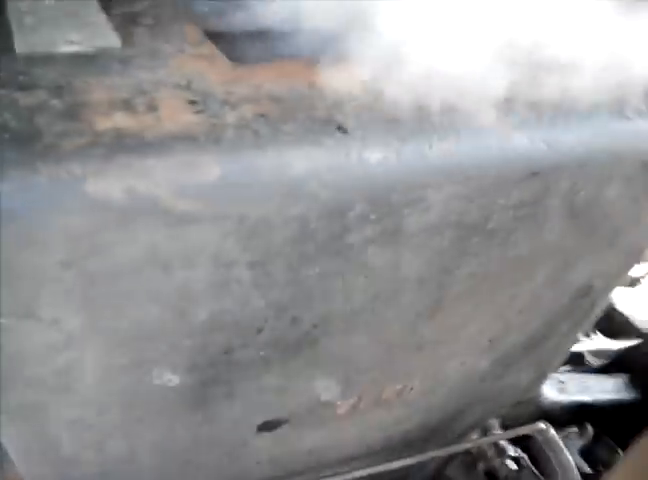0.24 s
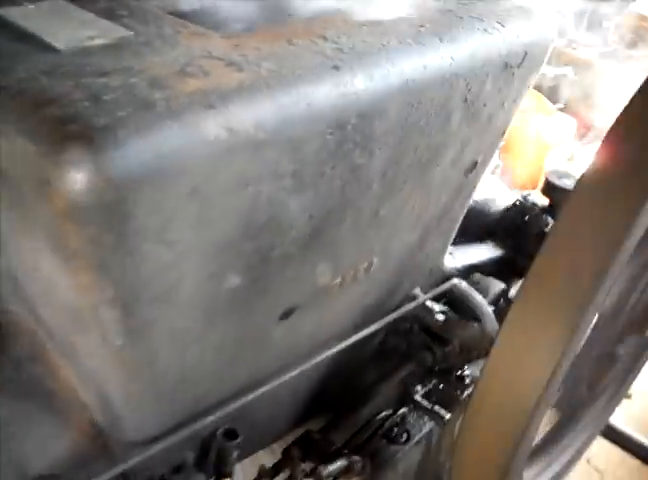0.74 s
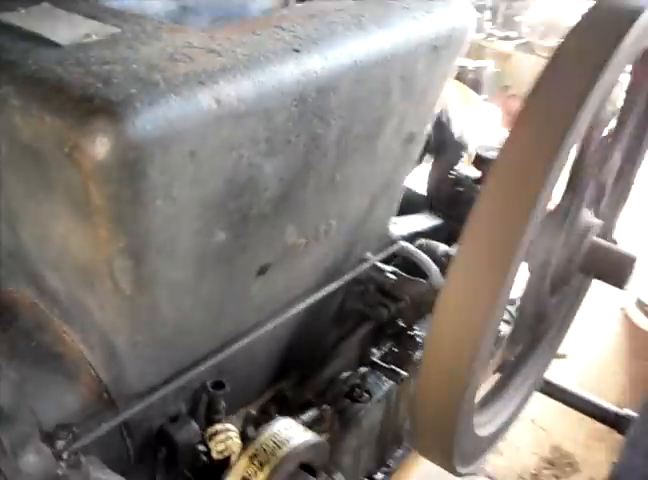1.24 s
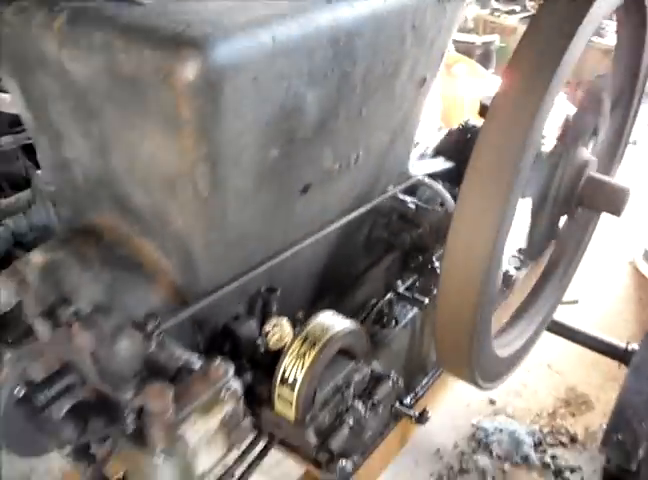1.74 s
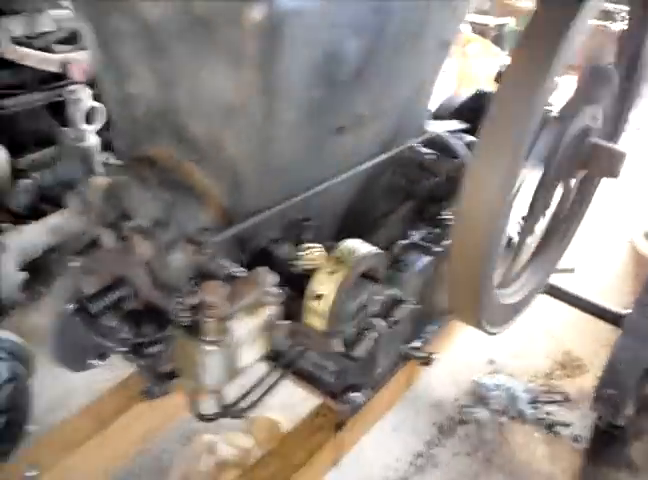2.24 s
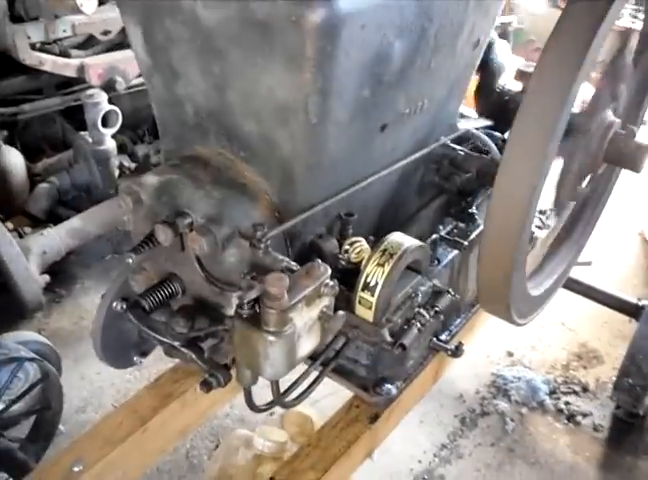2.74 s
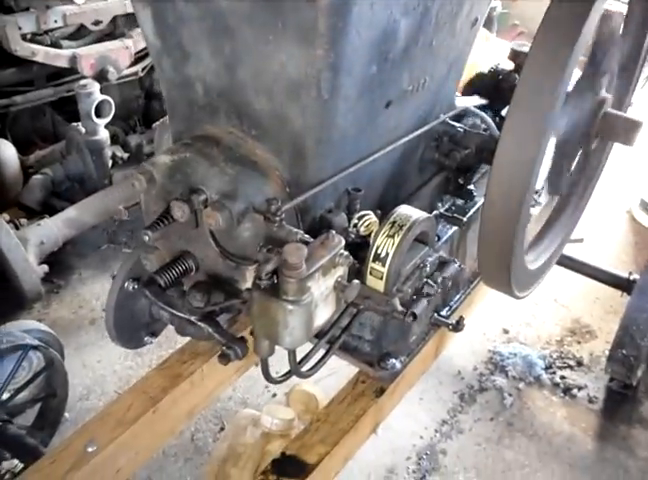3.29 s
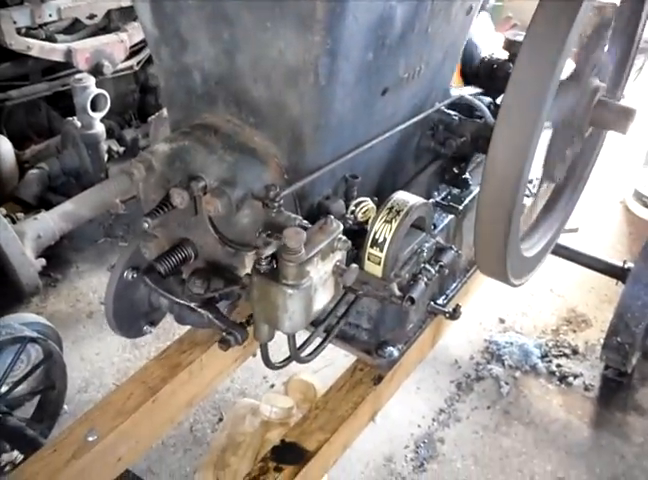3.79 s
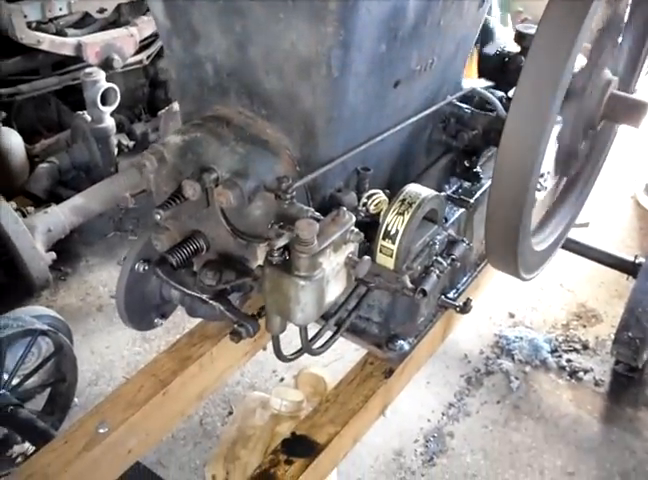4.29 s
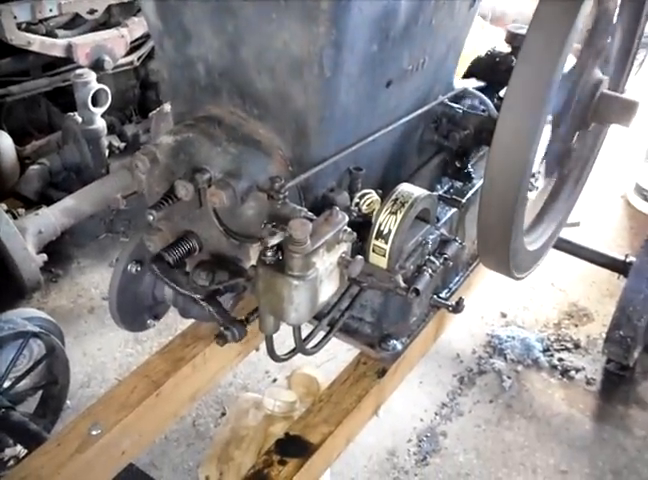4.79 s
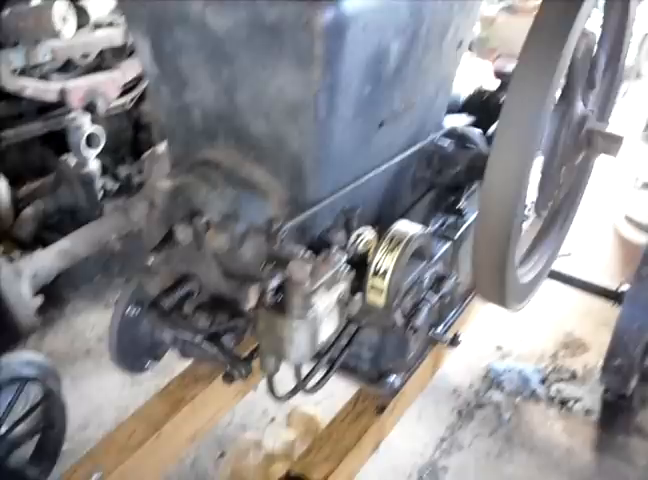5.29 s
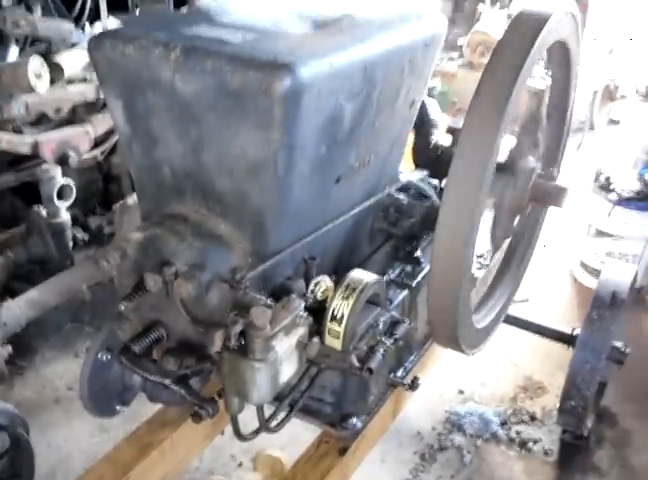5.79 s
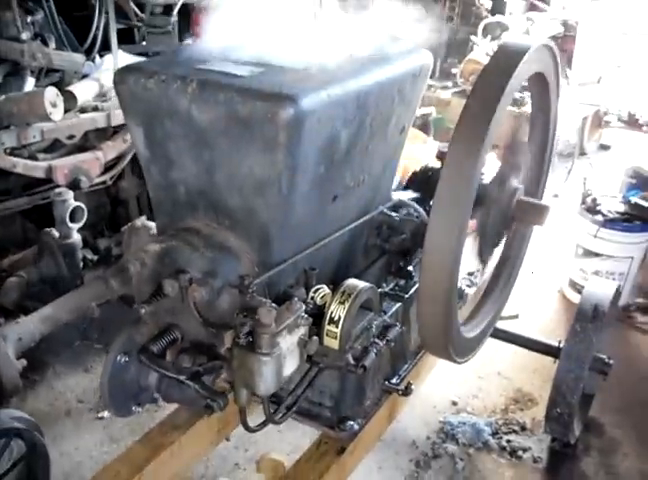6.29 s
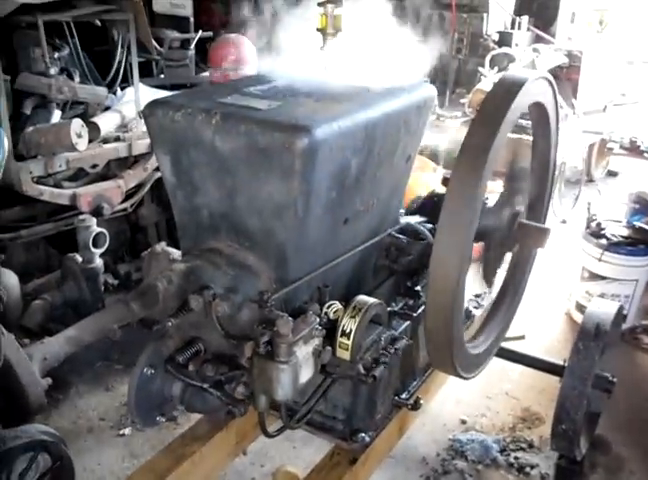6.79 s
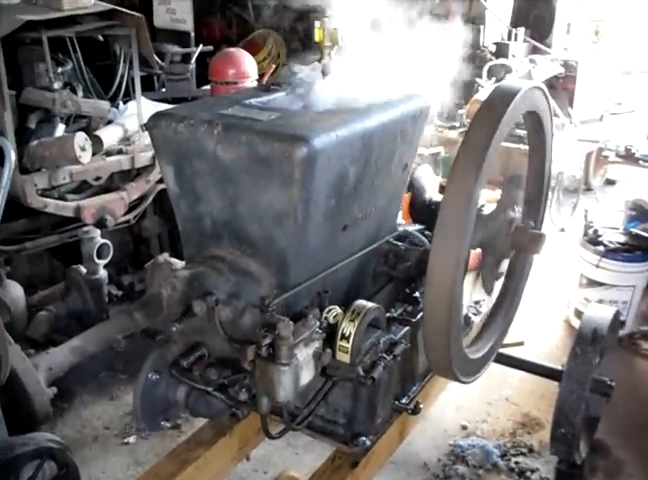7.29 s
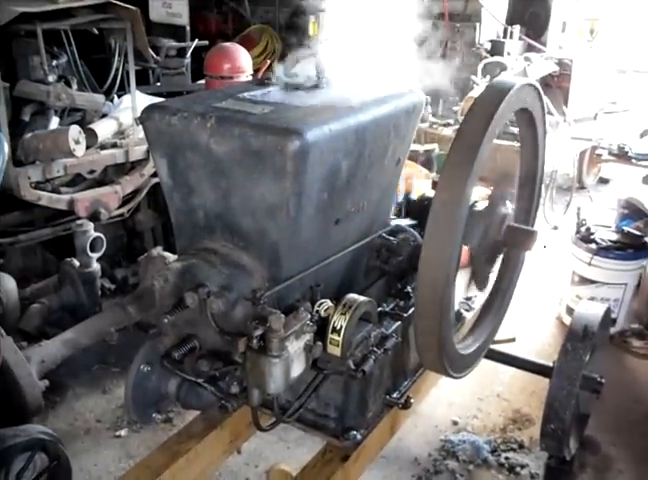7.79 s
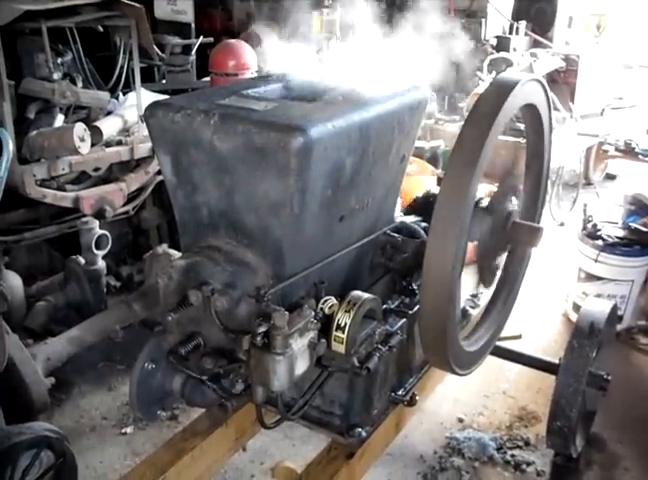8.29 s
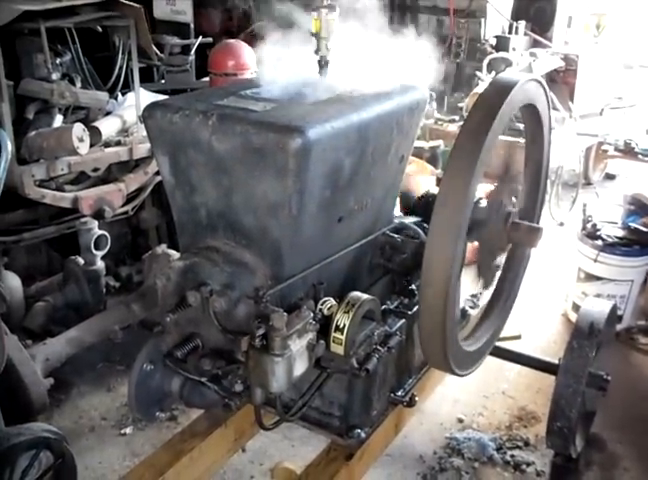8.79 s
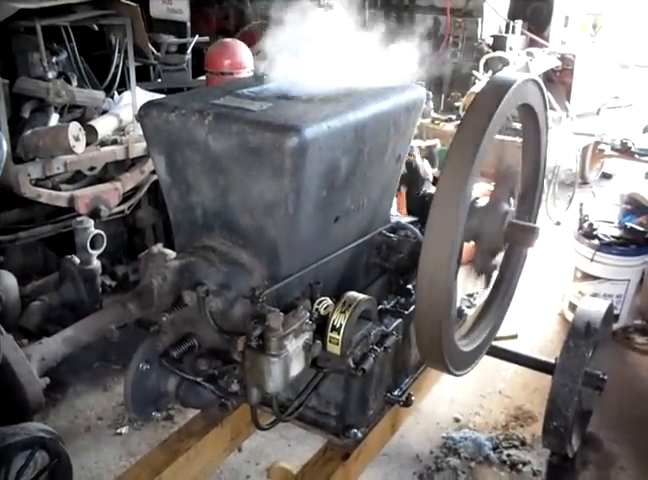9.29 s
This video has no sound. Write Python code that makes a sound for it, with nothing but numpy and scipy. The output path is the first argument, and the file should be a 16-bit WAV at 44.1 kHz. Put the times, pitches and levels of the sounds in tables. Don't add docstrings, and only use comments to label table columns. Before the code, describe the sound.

Steady engine beats: pop, spurt of hissing gas, iron clatter, a breathy squealing intake, a bright metallic click, then the next pop. Gear and bearing rumble fills the gaps. Mechanical noise is strongest at the start, close to the cylinder, and recedes as the listener steps back. A short dull workshop echo surrounds it; the band-limited microphone clips the beats, with little high treble.

```python
import sys
import numpy as np
from scipy import signal
from scipy.fft import rfft, irfft, next_fast_len
from scipy.io import wavfile

SR = 44100
rng = np.random.default_rng(int(sys.argv[2]) if len(sys.argv) > 2 else 0)


def linear_from_db(decibels):
    return 10 ** (np.asarray(decibels, float) / 20)


def output_pcm(signal):
    pcm = np.clip(np.atleast_2d(signal).T, -1, 1) * 32767
    wavfile.write(sys.argv[1], SR, np.round(pcm).astype(np.int16))


N = 420713

# time in seconds, charge level in dB, gas level in dB.
BEATS = [(-0.0972, 0.0, 0.0), (0.3376, 0.4, -4.5), (0.7732, 1.2, -3), (1.2093, 1.3, -0.9),
         (1.6454, 0.2, 0.7), (2.0797, 0.8, 0.8), (2.515, 0.8, 0), (2.9507, -0.4, 2.5), (3.3867, 0.8, 1),
         (3.824, 0.6, 4), (4.2654, -0.3, -1.5), (4.703, 0.2, 2), (5.1417, -0.4, 0.4), (5.5766, 0.1, -0.8),
         (6.0122, -1.8, 0.2), (6.4459, -1.8, -1.4), (6.8781, -0.9, -1.3), (7.313, -0.5, 2),
         (7.7485, -1.1, -1.7), (8.185, -0.9, 0.7), (8.623, -0.9, 0.5), (9.0595, -1.7, -2.9),
         (9.4966, -0.5, 0.3)]
# start in seconds, frequency in Hz, level in dB,
# swell in seconds, fade in seconds. The first is the pop; the rest swing the other way.
PIPE_SWINGS = [(-.0007, 310, -2.6, .0038, .0052), (.0105, 300, -18, .001, .009),
               (.0138, 108, -12.5, .009, .013), (.0165, 183, -24, .008, .012),
               (.0512, 120, -27, .006, .009), (.0732, 110, -27, .01, .011), (.004, 43, -15.5, .011, .022),
               (.0538, 45, -24.5, .022, .022), (.0973, 45, -36, .02, .022), (.145, 42, -39, .018, .015),
               (.195, 42, -40, .03, .03)]
# frequency in Hz, width in Hz, level in dB.
JET_MODES = [(538, 110, -2), (1340, 470, -6.5), (2078, 330, -3.5), (2800, 140, 2), (3275, 340, -1),
             (3790, 180, 1), (4790, 630, -1)]
# low tone in Hz, low tone in dB,
# middle tone in dB, high tone in Hz.
WHISTLES = [(1347, 1, 4, 3700), (1250, 4.5, -1.5, 3800), (460, 4.5, -5, 3100), (1410, -1.5, 1, 2770),
            (540, 0, 3, 3400), (560, 6.5, 3, 4800), (585, -3.5, 0, 2836), (591, -0.2, 2.5, 3300),
            (586, -2.3, -4.5, 2870), (536, -2, -6.5, 4000), (574, -5, 1.5, 3690), (674, -5, 1, 3010),
            (560, 4, -1, 4000), (1110, -5.5, -12, 2920), (1304, 2.2, -5, 4140), (1420, -2.5, -8.5, 1900),
            (1307, 1.5, -0.5, 3200), (483, -1, 3.3, 3140), (670, -2.5, -3.5, 2840), (460, -3.5, 1, 4000),
            (1170, -2, -6, 3200), (1350, -0.2, -11, 5400)]
# time the valve seats in seconds, seat level in dB, latch level in dB.
VALVES = [(0.2274, 5.5, 11), (0.6616, 1.2, 6.5), (1.0963, 2, 8.5), (1.5304, 2, 5), (1.9645, 1, 6.5),
          (2.4012, 1, 7), (2.8381, 3, 1), (3.2749, 1.8, 4.5), (3.7111, 1, 1), (4.1523, 0.5, 6),
          (4.5907, 3.5, 5), (5.027, 1, 2), (5.4636, 1.5, 3), (5.8994, -0.5, 1), (6.334, 0.5, 4.5),
          (6.767, -0.5, 2.5), (7.2018, -2.5, -4), (7.6368, -2.5, -6), (8.072, -1.5, 0), (8.5097, -1, 2.5),
          (8.946, -4, 0), (9.3827, -1, 0.5)]
# level in dB, low edge in Hz, high edge in Hz, rattle in seconds, own ring in Hz.
CAM_KNOCKS = [(-19, 820, 4100, 0.016, 2500), (-16.5, 1800, 3300, 0.0062, 1300),
              (-21.5, 2500, 5000, 0.0057, 2620), (-17, 1700, 1800, 0.0031, 3270)]
CAM_DELAYS = (.078, .096, .108, .13)
# level in dB, low edge in Hz, high edge in Hz, rattle in seconds, own ring in Hz.
GEAR_CONTACTS = [
    (-15, 2600, 5400, 0.0055, 3900),
    (-25, 2100, 4950, 0.006, 3900),
    (-20, 1600, 4500, 0.022, 3600),
    (-18, 1100, 5100, .005, 2200),
    (-23.5, 2400, 4000, 0.0084, 2900),
]
GEAR_DELAYS = (0, -.15, -.095, .05, .093)
# frequency in Hz, width in Hz, level in dB.
IRON_MODES = [(1270, 43, -8.5), (2241, 60, 1.5), (2678, 55, 0.5), (2960, 45, -7.5), (3340, 38, -10.5),
              (3690, 59, -7), (4280, 60, -6), (5060, 21, -8)]
# centre and half-length as shares of the cycle,
# breath level in dB, wheeze level in dB.
STROKES = [(0.032, 0.048, 7, 5.5), (.19, .15, 1, 1.6), (0.379, 0.059, -6, -17), (.52, 0.11, 0.6, -3.6),
           (.77, 0.068, 1.5, 2.5), (.92, .09, -3, -7.5)]
# frequency in Hz, width in Hz, level in dB.
INTAKE_MODES = [(762, 110, 0.5), (851, 90, 3), (1081, 150, 1.5), (1243, 50, -9.5)]
# frequency in Hz, width in Hz, level in dB.
WHEEZE_MODES = [(2223, 140, -5), (2500, 580, -1.5), (3250, 460, 1), (3810, 100, 2), (4500, 740, -2.5),
                (5162, 330, 2)]
# frequency in Hz, width in Hz, level in dB.
SQUEAL_MODES = [(2212, 260, 3), (2430, 240, 2), (3820, 260, 2), (4120, 200, -6.5)]
# frequency in Hz, level in dB per Hz.
RUMBLE_SPECTRUM = [(15, -31), (30, -9.5), (70, -5), (208, 2), (507, -3.5), (1400, -5.5), (3000, -10),
                   (5820, -25)]
# time in seconds, nearness in dB.
NEARNESS = [(0.0, 4.5), (0.5, 3), (1.0, 1.4), (1.5, 1.2), (2.5, -0.1), (4.0, -0.27), (5.5, -0.2),
            (7.0, -0.5), (9.54, -1.1)]


def pipe():
    first = PIPE_SWINGS[0][0]
    swings = np.zeros(SR // 2)
    for k, (start, hz, db, swell, fading) in enumerate(PIPE_SWINGS):
        t = np.maximum(np.arange(SR // 2) / SR + first - start, 0)
        sign = 1 if k == 0 else -1
        swings += sign * linear_from_db(db) * np.sin(2 * np.pi * hz * t) * np.exp(-((t - swell) / fading) ** 2)
    return signal.oaconvolve(place(BEATS, 1, first), swings)[:N]


def blast():
    gas = grit(0.46)
    tones = sum((-1) ** k * resonate(gas, [mode]) * flicker(1.5, 5) for k, mode in enumerate(JET_MODES))
    hiss = linear_from_db(-9) * band(rng.standard_normal(N), 400, 4000)
    jet = rms_one(tones + hiss) * flicker(2.2, 90)
    gust = fade(place(BEATS, 2, 0.003), 0.0037) / (0.0055 * SR)
    push = linear_from_db(-2.5) * fade(gust, 0.01) + linear_from_db(-18.5) * fade(gust, 0.045)
    leak = linear_from_db(-21) * fade(place(BEATS, 2, -0.002), 0.0074)
    return jet * (push + leak)


def beat_tones():
    lag_s, whistle_db = 0.0072, -21
    mouth_hz, mouth_spread_hz = 2093, 28
    out, t = np.zeros(N + SR), np.arange(SR // 8) / SR
    gust = (1 - np.exp(-t / 0.0035)) * np.exp(-t / 0.021)
    gases = rng.standard_normal((len(WHISTLES), len(t)))
    for (s, _, gas_db), whistle, gas in zip(BEATS[1:], WHISTLES, gases):
        low_hz, low_db, mid_db, high_hz = whistle
        mid_hz = mouth_hz + mouth_spread_hz * gas[0]
        modes = [(low_hz, 50, low_db), (mid_hz, 60, mid_db), (high_hz, 110, 1.1 * gas_db + 2.5)]
        at = round((s + lag_s) * SR)
        for hz, width_hz, level_db in modes:
            tone = rms_one(resonate(gas * gust, [(hz, width_hz, 0)]))
            out[at:at + len(t)] += linear_from_db(whistle_db + level_db) * tone / 2
    return out[:N]


def contact(clicks, noise, db, low_hz, high_hz, rattle, ring_hz):
    touch = band(linear_from_db(db) * (4.5 * clicks + fade(clicks, rattle) * noise), low_hz, high_hz)
    return 1.77 * touch + resonate(touch, [(ring_hz, 160, 8)])


def valve_gear():
    noise = rng.standard_normal(N)
    beats, seats = np.array(BEATS)[:, :1], np.array(VALVES)
    play_db = 2.5 * noise[:4 * len(beats)].reshape(-1, 4)
    knocks = np.c_[beats, heard(beats, -0.31, 0.67) + play_db[:, :1]]
    parts = np.c_[seats, heard(seats[:, :1], -0.24, 1.3) + play_db[1:, 1:]]
    cam = sum(contact(place(knocks, 1, s), noise, *row) for s, row in zip(CAM_DELAYS, CAM_KNOCKS))
    gear = sum(contact(place(parts, k + 1, s), noise, *GEAR_CONTACTS[k]) for k, s in enumerate(GEAR_DELAYS))
    bounce = contact(place(VALVES, 1, 0.014), noise, -29, 2500, 5400, 0.011, 2700)
    snap = linear_from_db(6) * band(place(VALVES, 1, -0.0003), 2400, 7000)
    touches = cam + gear + bounce + snap
    return touches + linear_from_db(3.5) * resonate(touches, IRON_MODES)


def strokes(share):
    still_air_db = -10.5
    power = linear_from_db(2 * still_air_db)
    for centre, half, breath_db, wheeze_db in STROKES:
        off = (share - centre + 0.5) % 1 - 0.5
        swell = linear_from_db([[breath_db], [wheeze_db]]) * np.exp(-(off / half) ** 4)
        power = power + swell ** 2
    return np.sqrt(power)


def intake_breath(t, air, breathing):
    breath = rms_one(sum(resonate(air, [mode]) * flicker(2.5, 8.1) for mode in INTAKE_MODES))
    return breath * linear_from_db(heard(t, -30, 0.73)) * breathing * flicker(1.4, 30)


def wheeze(t, wheezing):
    rasp = grit(3.4)
    flutter = flicker(1.4, 40)
    singing = sum(resonate(rasp, [mode]) * flicker(2.2, 8) for mode in IRON_MODES)
    sound = rms_one(resonate(rasp, WHEEZE_MODES) + singing)
    return sound * linear_from_db(heard(t, -31.5, 0.69)) * wheezing * flutter


def valve_squeal(t, air, share):
    drawing = np.exp(-((share - 0.52) / 0.09) ** 4)
    squeal = rms_one(sum(resonate(resonate(air, [mode]), [mode]) for mode in SQUEAL_MODES))
    return squeal * drawing * linear_from_db(heard(t, -32.5, 2.42)) * flicker(1.2, 25)


def rumble(t):
    size = next_fast_len(N)
    hz = np.maximum(np.fft.rfftfreq(size, 1 / SR), 1)
    corner_hz, corner_db = np.transpose(RUMBLE_SPECTRUM)
    colour = linear_from_db(np.interp(np.log(hz), np.log(corner_hz), corner_db))
    noise = irfft(rfft(rng.standard_normal(size)) * colour, size)[:N]
    return rms_one(noise) * linear_from_db(heard(t, -30.5, 0.9)) * flicker(1.5, 18)


def air_and_gears():
    t, air = np.arange(N) / SR, rng.standard_normal(N)
    beats = np.array(BEATS)[:, 0]
    turns = np.r_[beats, beats[-1] + np.diff(beats)[-1]]
    share = np.interp(t, turns, np.arange(len(turns))) % 1
    breathing, wheezing = strokes(share)
    moving_air = intake_breath(t, air, breathing) + wheeze(t, wheezing) + valve_squeal(t, air, share)
    return moving_air + rumble(t)


def workshop(x):
    t60_s, wall_cut_hz = 0.55, 3700
    size = next_fast_len(N + SR)
    angle = -2j * np.pi * np.arange(size // 2 + 1) / size
    dull = np.exp(-2 * np.pi * wall_cut_hz / SR)
    wall = (1 - dull) / (1 - dull * np.exp(angle))
    response = 0
    for k, lag in enumerate(rng.uniform(0.014, 0.05, 10)):
        loop = linear_from_db(-60 * lag / t60_s) * wall * np.exp(angle * round(lag * SR))
        response = response + (-1) ** k * loop / (1 - loop)
    return irfft(rfft(x, size) * response, size)[:N]


def heard(s, db, share):
    return db + share * np.interp(s, *np.transpose(NEARNESS))


def place(rows, column, delay):
    rows, clicks = np.array(rows), np.zeros(N + SR)
    at = np.round((rows[:, 0] + delay) * SR).astype(int)
    clicks[at[at >= 0]] = linear_from_db(rows[at >= 0, column])
    return clicks[:N] + 1e-18


def rms_one(x):
    return x / np.sqrt(np.mean(x ** 2))


def resonate(x, modes):
    out = 0
    for k, (hz, width_hz, db) in enumerate(modes):
        r = np.exp(-np.pi * width_hz / SR)
        zeros = [(1 - r * r) / 2, 0, (r * r - 1) / 2]
        poles = [1, -2 * r * np.cos(2 * np.pi * hz / SR), r * r]
        out = out + (-1) ** k * linear_from_db(db) * signal.lfilter(zeros, poles, x)
    return out


def band(x, low_hz, high_hz):
    return signal.sosfilt(signal.butter(2, [low_hz, high_hz], "band", fs=SR, output="sos"), x)


def fade(x, seconds):
    return signal.lfilter([1], [1, -np.exp(-1 / (seconds * SR))], x)


def flicker(spread_db, hz):
    smooth_s = 1 / (40 * np.pi * hz)
    slow = fade(fade(rng.standard_normal(N // 20 + 2001), smooth_s), smooth_s)[2000:]
    return np.interp(np.arange(N) / 20, np.arange(len(slow)), linear_from_db(spread_db * rms_one(slow)))


def grit(spread_db):
    grain_db = spread_db * np.minimum(rng.exponential(1, N), 3)
    return rms_one(rng.standard_normal(N) * linear_from_db(grain_db))


def scene():
    pops = pipe()
    hits = blast() + beat_tones() + valve_gear()
    echo = workshop(linear_from_db(-28) * band(pops, 100, 2000) + linear_from_db(-20) * hits)
    return (pops + hits + echo + air_and_gears())[None]


def roll_off(x):
    return signal.sosfilt(signal.butter(12, 15830, fs=SR, output="sos"), x)


def record(dry):
    pressed = dry / (1 + np.abs(dry / 0.76) ** 5) ** (1 / 5)
    sag = linear_from_db(-27) * pressed + signal.sosfilt(signal.butter(8, 5250, fs=SR, output="sos"), pressed)
    cut = signal.sosfilt(signal.ellip(10, 0.5, 80, 6050, fs=SR, output="sos"), sag)
    top, knee = 0.71, 24
    flat = cut / (1 + np.abs(cut / top) ** knee) ** (1 / knee)
    return roll_off(flat)


dry = scene()
out = record(dry)
output_pcm(out)
```